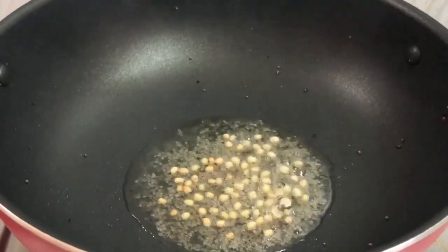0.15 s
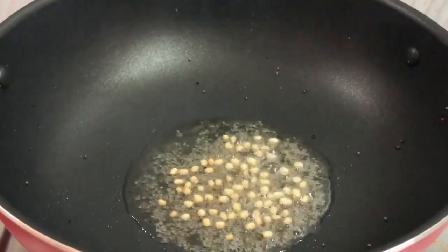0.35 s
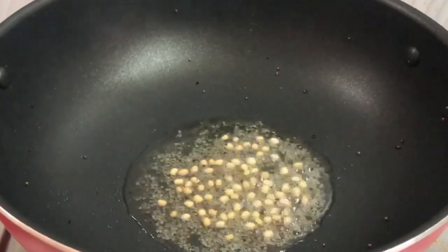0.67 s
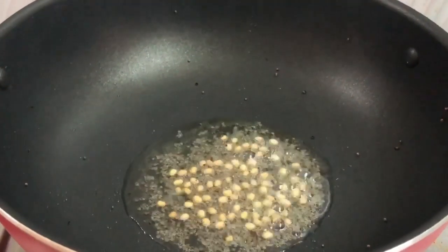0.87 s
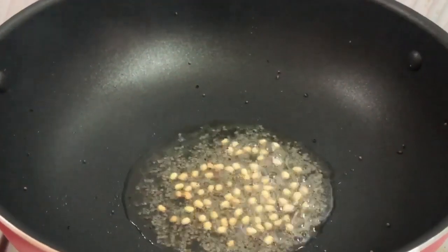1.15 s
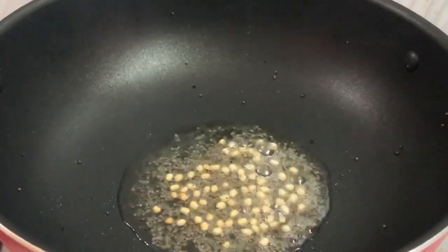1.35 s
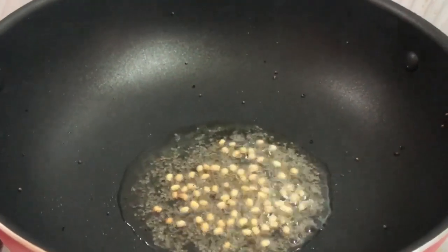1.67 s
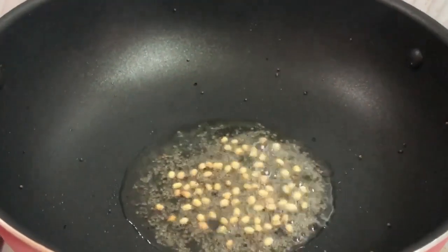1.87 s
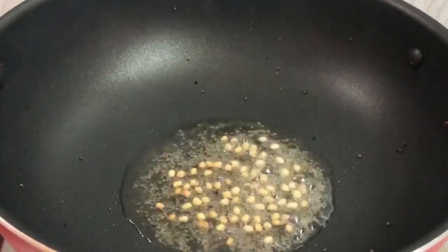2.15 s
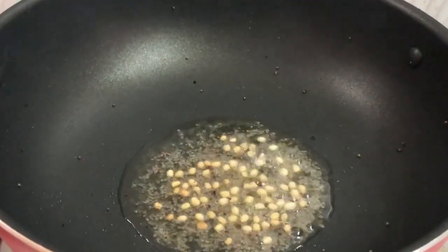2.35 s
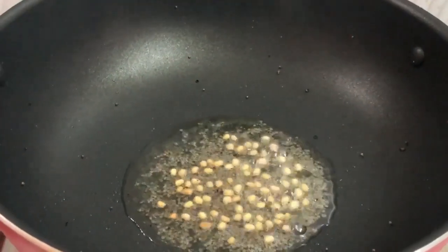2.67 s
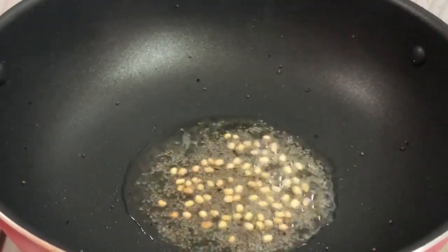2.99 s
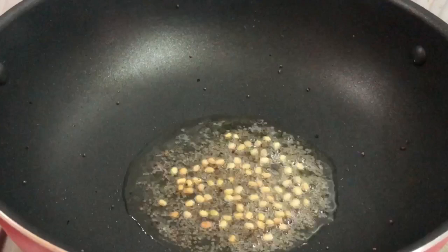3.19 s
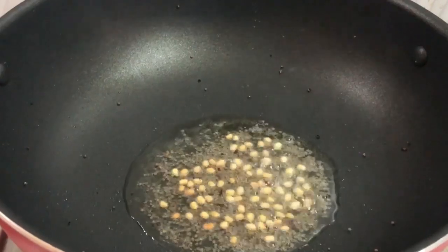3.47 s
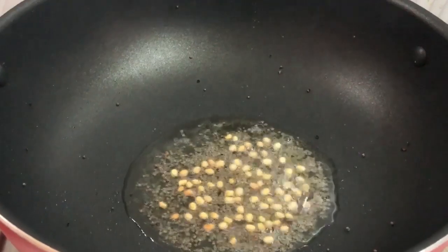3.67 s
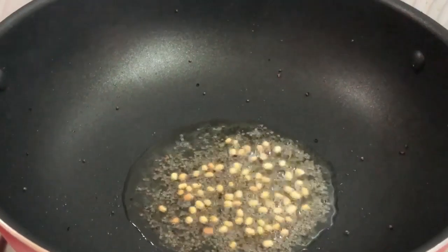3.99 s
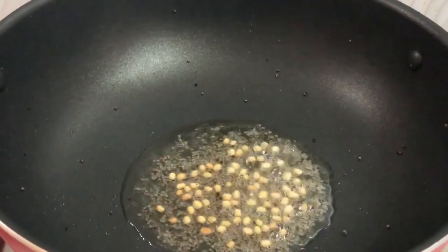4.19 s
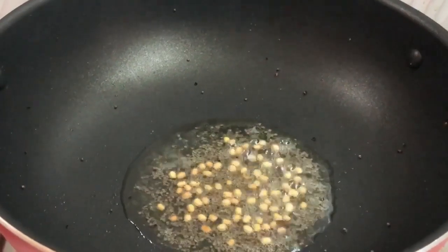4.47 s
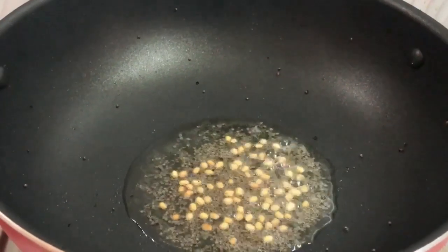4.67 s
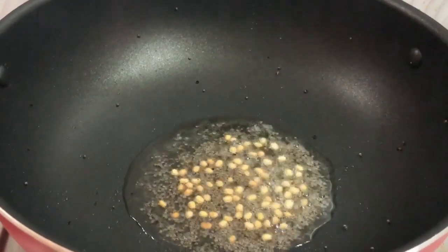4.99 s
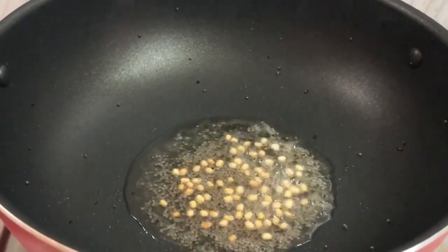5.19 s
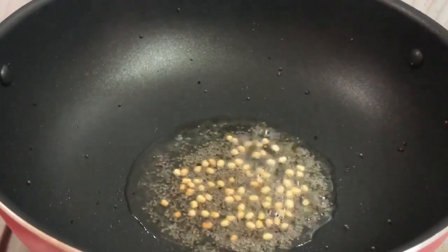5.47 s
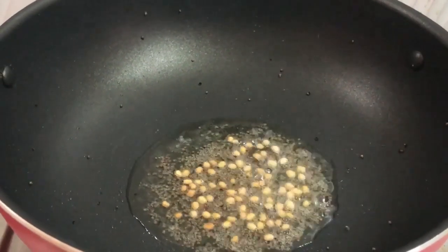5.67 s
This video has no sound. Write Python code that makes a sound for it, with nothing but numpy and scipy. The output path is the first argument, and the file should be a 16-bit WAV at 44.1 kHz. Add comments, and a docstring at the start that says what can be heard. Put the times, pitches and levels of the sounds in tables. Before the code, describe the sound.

Small seeds burst in hot oil in a deep pan, close to a phone microphone. Bright, dry snaps come in irregular clusters, thick in the first three seconds, then somewhat sparser, over a constant fine sizzle. The hard kitchen adds a short tail. A crow caws faintly four times in the first four seconds; dull wooden knocks sound far off near the start and again late. Low household rumble and hiss lie underneath.

```python
"""A small hard kitchen: mustard seeds burst in hot oil at the bottom of a deep pan, close under a phone.
Each pop is a click with pan echoes, filtered into ring, snap, bowl air and thud; it excites pan modes
and a short diffuse wall tail. Tiny random ticks sizzle throughout. Further off, two groups of dull
knocks ring wooden modes and a crow calls in rough harmonics, over shaped-noise rumble, drone and hiss."""
import sys
import numpy as np
from scipy import signal
from scipy.fft import rfft, irfft, next_fast_len
from scipy.io import wavfile
from scipy.ndimage import uniform_filter1d

SR = 44100
rng = np.random.default_rng(int(sys.argv[2]) if len(sys.argv) > 2 else 0)


def put_to_file(sound):
    """Save the sound as 16-bit audio at rate SR, in the file named by the first command-line argument."""
    columns = np.atleast_2d(sound).T  # one column per channel
    safe = np.clip(columns, -1, 1)
    whole_steps = np.round(safe * 32767)
    wavfile.write(sys.argv[1], SR, whole_steps.astype(np.int16))


N = 257385

# household noise spectrum: f/Hz, relative density/dB per Hz
HOUSE_SPECTRUM = [(15, -39), (25, -25), (97, -0.5), (159, 3), (358, -11), (634, -9), (952, -12),
                  (1030, -10.5), (1280, -8.5), (1600, -5.5), (2150, -15), (5130, -21.5), (11900, -12),
                  (15200, -17), (16500, -44)]
# narrow humming bands: f/Hz, width/Hz, level over the noise/dB
DRONE_BANDS = [(49, 27, 7), (88.4, 6.4, 10), (334.6, 6, 16), (376.6, 68, 8.5)]
# slow swell of the bass, used relative to the mean of its points: t/s, level/dB
BASS_SWELL = [(0.0, -58.5), (0.31, -62), (0.86, -60), (4.24, -63.5), (4.5, -61), (5.83, -64.5)]
HOUSE_RMS_DB = -51.5

# crow calls: start/s, length/s, level/dB, top pitch/Hz, top throat resonance/Hz
CROW_CALLS = [(0.141, 0.38, -56, 212.5, 1800), (2.256, 0.5, -58.5, 205, 1470), (3.002, .38, -58, 211, 1850),
              (3.634, 0.41, -56.5, 209.4, 1850)]
CAW_ATTACK_S, CAW_RELEASE_S = 0.047, 0.14
# share of the call; drop per squared share away from the top
CAW_TOP_AT, CAW_PITCH_SAG, CAW_THROAT_SAG = 0.4, 0.25, 1.1
CAW_ROUGHNESS = 0.03  # pitch wobble, rms share

# knocks in another room: t/s, blow level/dB
KNOCK_BLOWS = [(0.473, -16), (.492, -24), (4.661, -36), (4.686, -33), (4.7283, -17.5), (4.745, -45),
               (4.765, -44)]
# modes of the hollow wooden thing: f/Hz, level/dB, t60/s
WOOD_MODES = [(228, -9, 0.045), (312, -3.5, 0.03), (424, -7.5, 0.027), (510, -12, 0.031), (643, -5, 0.018),
              (750, -1.5, 0.03), (898, -8.5, 0.016), (1055, -6, 0.027), (1176, -13, 0.022),
              (1355, -6, 0.031), (1595, -11, .02), (1850, -10.5, 0.02), (2300, -9, 0.014),
              (2900, -5, 0.014)]

# bursting seeds: t/s, body level/dB (energy of the first 2 ms packed into 1 ms), ring f/Hz,
# snap minus body/dB, bowl minus body/dB
SEED_POPS = [(.033,-30,4700,5,-12),(.0428,-36,3920,-4,-10),(0.048,-26.5,4600,4,-9),(.0574,-26,3920,-13,-6),
             (.062,-19.5,5900,-7,-5),(.0638,-22.5,5250,5,-2),(0.0704,-15.5,3100,-1.5,-6),(0.0746,-19,3200,2.5,-17),
             (0.1093,-32,4180,-4,-10),(.1975,-30,5600,-1,-8),(.2137,-28,7540,2,4),(0.2246,-20,5000,1.5,-4.5),
             (0.3204,-21,5940,-3.5,-28),(.336,-19.5,3960,-12,-24),(0.3403,-20,3770,-9,-15),(0.3494,-21.5,3920,11,-29),
             (.3789,-13.5,5400,0,-2),(.393,-23.5,4700,-15,-27),(0.4367,-21,4670,1,-11),(.498,-25,3300,1,-11),
             (.5022,-20.5,6500,5.5,-3),(.604,-20.5,4250,-1,-5),(.6172,-31,7900,-5,-2),(0.625,-26,4100,-16,-8),
             (0.659,-28,5900,-11,-5.5),(.6912,-26,3770,6,-19),(0.6957,-20.5,5100,3.5,-30),(.7646,-24,7970,3,-2),
             (0.7737,-14,6640,0,0),(.796,-13.5,5650,-3.5,-38),(0.8168,-27,2850,-9,0),(0.8255,-20.5,7850,3,-4),
             (0.8422,-20.5,3200,-16,-13),(0.8519,-22,6460,-10,-21),(0.855,-27,6420,-2,-20),(0.8583,-29,6330,-7,-17),
             (.88,-18,5660,5.5,-3.5),(.909,-12.5,5750,1,-37),(.934,-21.5,3830,-8,-24),(0.9394,-22,7850,7,-3),
             (.9906,-25,3880,1,-15),(1.0222,-17,5750,3.5,-6),(1.1248,-42,4140,11,-5),(1.1335,-21,4940,0.5,-2),
             (1.15,-18,4640,-27,-33),(1.194,-20,5500,2,-29),(1.1975,-22.5,3650,-4,-2.5),(1.203,-26,4130,-16,-17),
             (1.213,-24.5,4130,-1,-26),(1.2979,-29.5,3400,5,-21),(1.3306,-15,4070,-3,-0.5),(1.3345,-15.5,4530,2.5,-30),
             (1.3603,-46,3790,19,1),(1.3671,-18.5,5130,2,-26),(1.3968,-23,7140,-1,-5),(1.4022,-16.5,3270,-4,-23),
             (1.435,-19,5270,-4,-3),(1.476,-14,5400,-2.5,1.5),(1.5778,-21,4050,11.5,-24),(1.5875,-29.5,3700,7,-12),
             (1.641,-17.5,7600,4,-3.5),(1.6484,-40,6330,9,-12),(1.6617,-24,5460,-3,-24),(1.7029,-23,4670,11.5,-17),
             (1.7163,-16.5,4200,-1,-17),(1.744,-20.5,7540,7.5,-0.5),(1.7513,-27,7360,4,-3),(1.77,-40,3100,9,-4),
             (1.792,-15.5,5050,0.5,-1.5),(1.8017,-20,5430,3,-7),(1.8471,-23,6500,2,0),(1.8686,-32.5,5770,3,1),
             (1.9451,-32,2650,5,-4),(1.9626,-23.5,5120,2.5,-2),(1.9652,-27.5,3140,13,-12),(1.979,-20.5,3700,-7,-19),
             (1.9843,-22.5,7710,9,-2),(2.0128,-18.5,6470,3,0),(2.0403,-11,5500,0,-1.5),(2.0678,-22.5,8000,-2,-2),
             (2.0802,-19.5,4630,5.5,-12),(2.086,-20,3450,-4,-7),(2.1077,-21.5,3660,-6,-17),(2.1404,-34,3620,6,-14),
             (2.1476,-26,6980,14,-0.5),(2.158,-38,6600,13,-6),(2.2061,-20.5,4120,1,-20),(2.2392,-18,5500,2.5,-5),
             (2.265,-31,4150,-12,-15),(2.273,-21.5,7500,10.5,-2),(2.333,-18.5,5060,2.5,-12),(2.3646,-30.5,7540,7.5,-8),
             (2.3916,-20,6400,3,-10),(2.397,-27,4820,1,-7),(2.4073,-14.5,4250,0.5,-1.5),(2.4937,-19,4730,1,-19),
             (2.5344,-15,5060,2,-3),(2.546,-19.5,5170,2,0.5),(2.6348,-27,4800,-3,-3),(2.6474,-22,4260,4,-31),
             (2.731,-20,7770,-3,-5),(2.7817,-16,5700,2.5,-2.5),(2.8977,-15.5,5140,2.5,-10),(2.928,-24.5,3750,-3,-7),
             (2.982,-15,5300,1,-3.5),(3.0196,-19.5,4950,.5,-6),(3.0345,-18,3220,-27,1),(3.0785,-26,4470,-23,-4),
             (3.1253,-26,3400,6.5,-6),(3.15,-21.5,6800,8.5,-5),(3.1945,-18.5,7200,6,-26),(3.2064,-23,4100,-1,-11),
             (3.2287,-15.5,6740,3,-6),(3.3313,-32,3800,-9,-9),(3.3464,-32.5,5900,-2,-2),(3.4108,-21,4300,-5,-1.5),
             (3.492,-18,2940,-38,6.5),(3.5379,-24,6160,-7,-16),(3.5421,-16.5,7360,4,-6),(3.558,-20.5,5300,7.5,-24),
             (3.607,-22.5,4300,-3.5,-21),(3.6424,-20,6400,3.5,-32),(3.7877,-24,5830,-2,-0.5),(3.8365,-42,4010,-8,-7),
             (3.967,-35,3820,9,-19),(4.0063,-23.5,7460,11,-1.5),(4.0179,-26,7880,13,0),(4.0426,-22,3870,-7,-18),
             (4.0648,-16,5000,-1.5,-6),(4.2382,-13.5,4470,-1.5,-31),(4.2708,-19,5330,0,0),(4.3241,-20,5000,9,-12),
             (4.3434,-24,7320,5,-6),(4.3606,-16,4770,3,-20),(4.432,-21.5,7400,9.5,0.5),(4.554,-20.5,5250,6.5,-20),
             (4.5568,-23.5,3640,3,-6),(4.5864,-23,7000,10,-0.5),(4.6471,-22,5370,11,-8),(4.6548,-29,4200,0,-14),
             (4.673,-26.5,6500,13,2.5),(4.7663,-31,4300,-2,0),(4.7925,-27.5,5730,1.5,-10),(4.8207,-22,3700,-6,-3),
             (4.8315,-21,5200,-2,-3),(4.86,-25,3830,-4,-1),(4.9455,-26,4600,-1,-3.5),(4.9864,-23,3560,-9,-19),
             (5.0555,-27,3900,2.5,-2),(5.0692,-28.5,4560,3,0),(5.138,-20,3740,-6,-8),(5.1596,-29,3660,8,-18),
             (5.2106,-27.5,4740,1.5,-5),(5.2587,-16.5,3830,0,-36),(5.3457,-25,5640,-3,-37),(5.4408,-15,5650,-0.5,-1.5),
             (5.457,-19,5700,8.5,-8),(5.6006,-35,4520,7,-12),(5.606,-23,5160,1.5,-26),(5.6603,-19,6800,6,-2),
             (5.6865,-18,5400,2.5,-28),(5.715,-17,7000,4.5,-7),(5.7234,-16.5,6100,-3,0),(5.8354,-31,6340,3,-4)]
# a pop just gone, still in the walls: body level/dB, ring f/Hz, snap minus body/dB,
# bowl minus body/dB, room minus body/dB
EARLIER_POP = (-16, 5000, 4, -5, -29)
# pan modes: f/Hz, level over the pan ring/dB, t60/s
PAN_MODES = [(1197, 0.5, 0.094), (1224, -1.5, 0.23), (1221, 12, 0.049), (777, -4, 0.082), (1910, 10, 0.025)]
# the pan rings with the part of a pop that fills the bowl, and less as time goes on
PAN_DB, PAN_SHARE, PAN_FALL_DB_PER_S, PAN_SCATTER_DB = -37, 0.53, 2, 6.5
# air resonances in the bowl of the pan: f/Hz, sharpness/Q, relative level/dB
BOWL_AIR = [(2400, 6, -4), (3300, 3.5, 0)]
BOWL_EDGE_HZ = 2500

# edges of the kitchen tail bands: f/Hz
TAIL_EDGES_HZ = [150, 500, 1100, 2200, 5000, 9000, 20000]
# kitchen tail between those edges: t60/s, level/dB
TAIL_BANDS = [(0.78, 0.5), (0.51, 4), (0.34, 5.5), (0.5, 0.5), (0.4, 1), (0.41, -0.5)]
ROOM_DB = -26  # level feeding the tail, relative to each pop

MIC_CORNER_HZ, TOP_HZ = 15100, 16550


def undb(db):
    """Gain of a level in dB."""
    return 10 ** (np.asarray(db) / 20)


def fade(t, t60):
    """Exponential decay, 60 dB in t60 seconds."""
    return np.exp(-np.log(1000) * t / t60)


def peak(f, hz, q):
    """Complex response of one resonance, gain 1 at the centre."""
    return 1 / (1 + 1j * q * (f / hz - hz / f))


def place(shapes, times_s):
    """Adds each shape into a track at its time."""
    starts = (np.asarray(times_s) * SR).astype(int)
    at = starts[:, None] + np.arange(shapes.shape[1])
    return np.bincount(at.ravel(), shapes.ravel(), N + SR)[:N]


def ring(x, modes, rise_s):
    """Excites decaying modes of alternating sign that take rise_s to swing up."""
    t = np.arange(SR // 2) / SR
    tones = 0
    for k, (hz, db, t60) in enumerate(modes):
        tones = tones + (-1) ** k * undb(db) * fade(t, t60) * np.sin(2 * np.pi * hz * t)
    return signal.fftconvolve(x, tones * (1 - np.exp(-t / rise_s)))[:N]


def kitchen(x, gap_s):
    """Diffuse wall tail of banded decaying noise that builds up over gap_s."""
    t = np.arange(SR // 2) / SR
    band = np.digitize(np.fft.rfftfreq(len(t), 1 / SR), TAIL_EDGES_HZ) - 1
    grain, size = rng.standard_normal((2, len(t)))
    noise = rfft(grain * undb(7 * size * fade(t, 0.3)))  # early on single echoes stand out
    tail = 0
    for k, (t60, db) in enumerate(TAIL_BANDS):
        tail = tail + undb(db) * fade(t, t60) * irfft(noise * (band == k), len(t))
    build_up = 1 - np.exp(-(t / gap_s) ** 2)
    return signal.oaconvolve(x, tail * build_up / np.sqrt(SR / 1000))[:N]


def bursts(body_db, ring_hz, snap_db, bowl_db, scatter=1, size=512):
    """One row per burst: a click and its pan echoes, filtered into ring, bowl air, thud and snap."""
    t = np.arange(size) / SR
    f = np.fft.rfftfreq(size, 1 / SR) + 1  # +1 avoids division by zero
    echoes = scatter * rng.standard_normal((len(ring_hz), 2, size)) * (1 - np.exp(-(t / 0.0002) ** 2))
    thud = rng.uniform(-0.1, 1, len(ring_hz))
    click = (t == 0) * 1.0
    body = click + echoes[:, 0] * (undb(-18) * fade(t, 0.005) + undb(-26) * fade(t, 0.018))
    snap = click + echoes[:, 1] * (undb(-17) * fade(t, 0.004) + undb(-29) * fade(t, 0.016))

    # the bowl lets little out below its edge
    upwards = (1 / (1 + BOWL_EDGE_HZ / (1.3j * f) - (BOWL_EDGE_HZ / f) ** 2)) ** 3
    # a pop with little snap rings more clearly
    ring_q = np.clip(1.5 - 0.23 * snap_db, 0.8, 4)[:, None]
    ring_colour = upwards * peak(f, ring_hz[:, None], ring_q) ** 2
    bowl_colour = upwards * sum(undb(db) * peak(f, hz, q) for hz, q, db in BOWL_AIR)
    thud_colour = peak(f, 780, 2.0) ** 2 - peak(f, 1450, 1.6) ** 2
    snap_colour = peak(f, 11220, 1.69) * peak(f, 6200, 0.1)

    parts = ((body, ring_colour, 0),
             (body, bowl_colour, bowl_db),
             (body, thud_colour, -21 + 3 * thud),
             (snap, snap_colour, snap_db))
    out = 0
    for drive, colour, db in parts:
        part = irfft(rfft(drive) * colour, size)
        energy = np.sum(part[:, :SR // 500] ** 2, axis=1) / (SR / 1000)  # first 2 ms, over 1 ms
        out = out + part * (undb(body_db + db) / np.sqrt(energy))[:, None]
    return out


def house():
    """Steady rumble, drone and hiss: shaped noise, each octave drifting a little on its own."""
    size = next_fast_len(N)
    f = np.fft.rfftfreq(size, 1 / SR) + 1
    hz, db = np.transpose(HOUSE_SPECTRUM)
    hum = 1 + sum(undb(g) * abs(peak(f, c, c / w)) ** 2 for c, w, g in DRONE_BANDS)
    colour = undb(np.interp(np.log(f), np.log(hz), db)) * hum
    noise = rfft(rng.standard_normal(size)) * colour

    s, bass_db = np.transpose(BASS_SWELL)
    swell_db = np.interp(np.arange(N) / SR, s, bass_db - bass_db.mean())
    marks = np.arange(0, N + SR, SR // 3)
    out = 0
    for lo in 16 * 2 ** np.arange(11):
        drift = np.interp(np.arange(N), marks, rng.standard_normal(len(marks)))
        octave = irfft(noise * (f >= lo) * (f < 2 * lo), size)[:N]
        out = out + octave * undb(0.6 * drift + swell_db * (lo < 200))  # swell below 256 Hz only
    return out * undb(HOUSE_RMS_DB) / out.std()


def crow():
    """Rough harmonics through a throat resonance; pitch and throat arch over each call; tail blurs it."""
    t, out = np.arange(N) / SR, 0
    wobble = uniform_filter1d(rng.standard_normal(N), 300) * np.sqrt(300)
    for s, length, db, top_hz, top_throat_hz in CROW_CALLS:
        away = (np.clip((t - s) / length, 0, 1) - CAW_TOP_AT) ** 2
        pitch_hz = top_hz * (1 - CAW_PITCH_SAG * away)
        throat_hz = top_throat_hz * (1 - CAW_THROAT_SAG * away)
        phase = 2 * np.pi * np.cumsum(pitch_hz * (1 + CAW_ROUGHNESS * wobble)) / SR
        voice = 0
        for k in range(4, 12):
            voice = voice + abs(peak(k * pitch_hz, throat_hz, 4.3)) ** 2 * np.sin(k * phase + k * k)
        attack, release = (t - s) / CAW_ATTACK_S, (s + length - t) / CAW_RELEASE_S
        out = out + voice * undb(db) * np.clip(np.minimum(attack, release), 0, 1)
    return out + undb(-15.5) * kitchen(out, 0.01)


def knocks():
    """Blows excite the modes of a hollow wooden thing, with a noise rattle and a wall tail."""
    s, blow_db = np.transpose(KNOCK_BLOWS)
    wood = ring(place(undb(blow_db)[:, None], s), WOOD_MODES, 0.004)
    t = np.arange(SR // 10) / SR
    rattle = undb(-27.5) * rng.standard_normal(len(t)) * fade(t, 0.044)  # loose parts shake on
    wood = wood + signal.fftconvolve(wood, rattle)[:N]
    far = undb(2.5) * wood + undb(-15.5) * kitchen(wood, 0.0085)
    return signal.sosfilt(signal.butter(4, 190, "high", fs=SR, output="sos"), far)


def sizzle(count=1700):
    """Tiny bubbles and oil droplets tick at random: small bursts of random level, pitch and snap."""
    when, pitch, big, bright = rng.random((count, 4)).T
    body_db = -62 - 4.6 * np.log(big)
    ticks = bursts(body_db, 3000 * 2.2 ** pitch, 12 * (bright - 0.6), -6)
    return place(ticks, when * N / SR)


def seeds(spots=6):
    """Loud pops of bursting seeds, the pan modes they shake and their wall tails."""
    s, body_db, ring_hz, snap_db, bowl_db = np.transpose(SEED_POPS)
    pops = place(bursts(body_db, ring_hz, snap_db, bowl_db), s)
    pan_db = PAN_DB + PAN_SHARE * (body_db + bowl_db) - PAN_FALL_DB_PER_S * s
    pan_db = pan_db + PAN_SCATTER_DB * rng.standard_normal(len(s))
    out = pops + ring(place(undb(pan_db)[:, None], s), PAN_MODES, 0.003)

    bare = bursts(body_db + ROOM_DB, ring_hz, snap_db, bowl_db, scatter=0)
    for k in range(spots):  # seeds burst at different spots, facing different walls
        out = out + kitchen(place(bare[k::spots], s[k::spots]), 0.0079)

    body_db, ring_hz, snap_db, bowl_db, room_db = np.array(EARLIER_POP)[:, None]
    earlier = bursts(body_db + room_db, ring_hz, snap_db, bowl_db, scatter=0)
    return out + kitchen(place(earlier, [0]), 1 / SR)


def scene():
    """All sources sum at one microphone."""
    return (house() + crow() + knocks() + sizzle() + seeds())[None]


def record(dry):
    """The microphone dulls the top; the phone rounds the loudest peaks and cuts above TOP_HZ."""
    dull = signal.sosfilt(signal.butter(4, MIC_CORNER_HZ, fs=SR, output="sos"), dry)
    rounded = np.tanh(0.6 * dull) / 0.6
    return signal.sosfilt(signal.ellip(8, 1, 60, TOP_HZ, fs=SR, output="sos"), rounded)


dry = scene()
out = record(dry)
put_to_file(out)
```